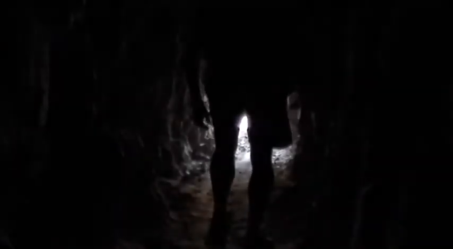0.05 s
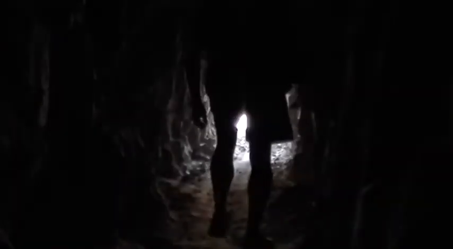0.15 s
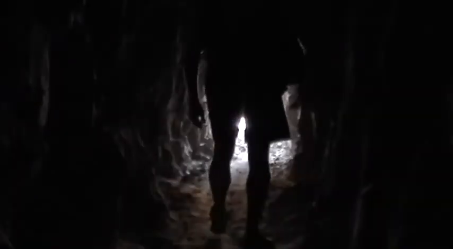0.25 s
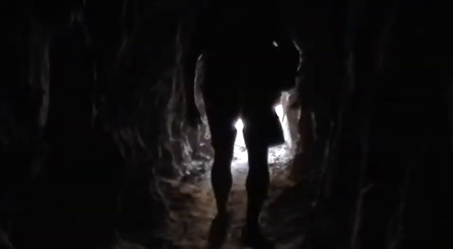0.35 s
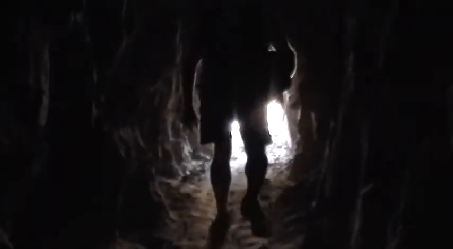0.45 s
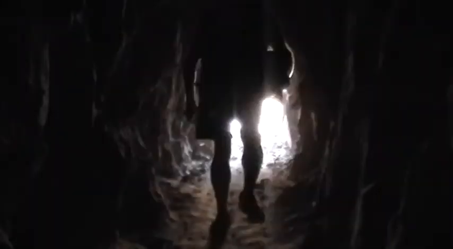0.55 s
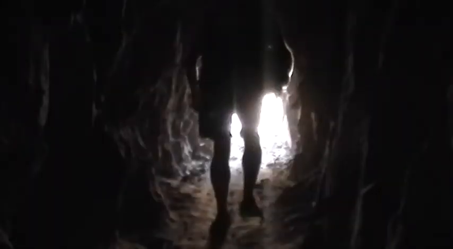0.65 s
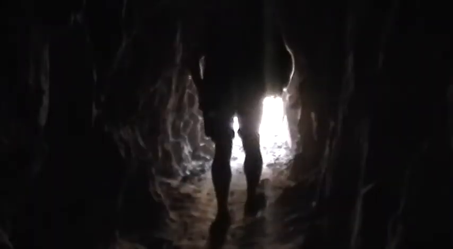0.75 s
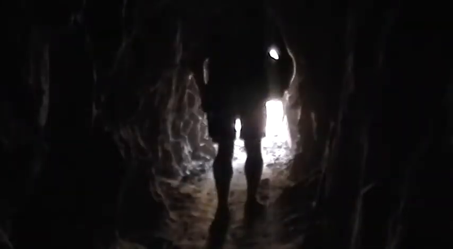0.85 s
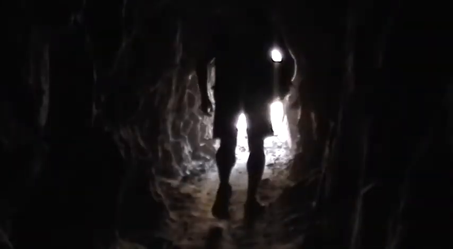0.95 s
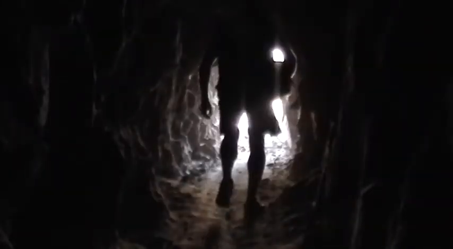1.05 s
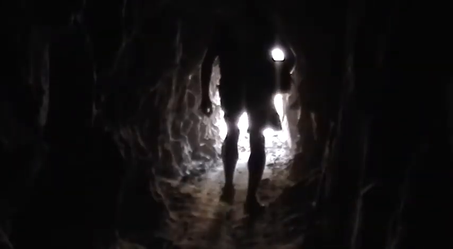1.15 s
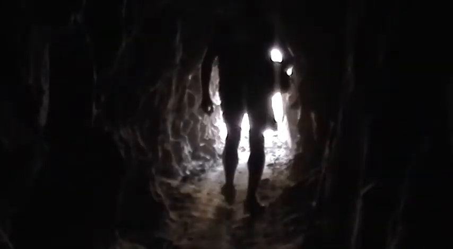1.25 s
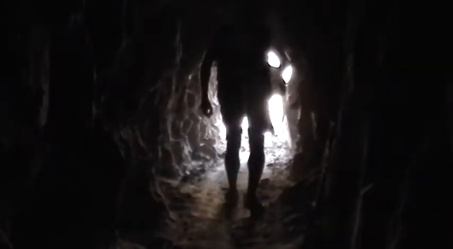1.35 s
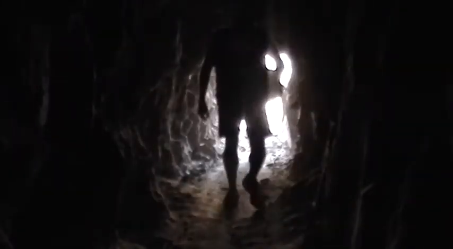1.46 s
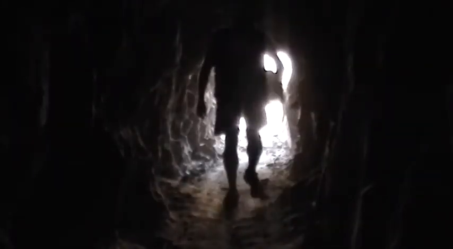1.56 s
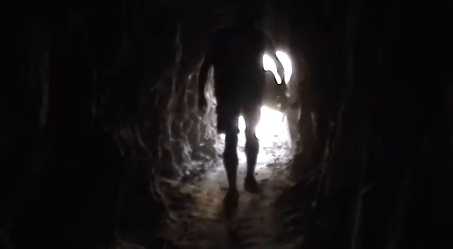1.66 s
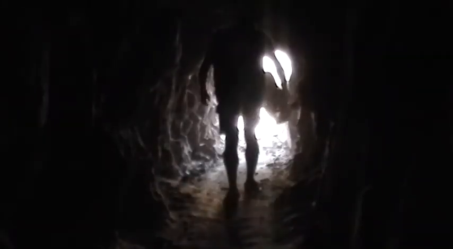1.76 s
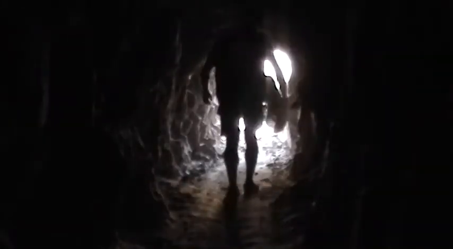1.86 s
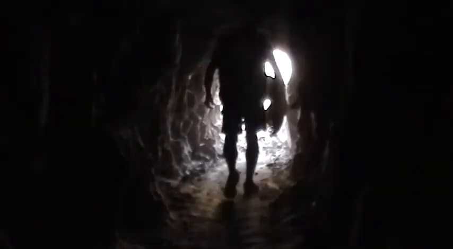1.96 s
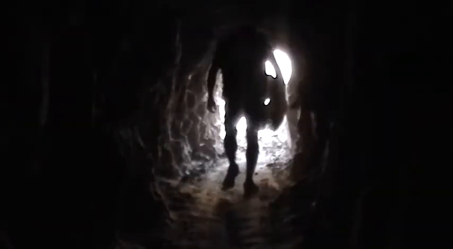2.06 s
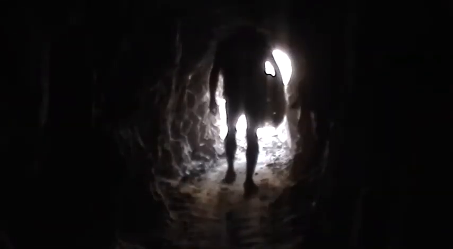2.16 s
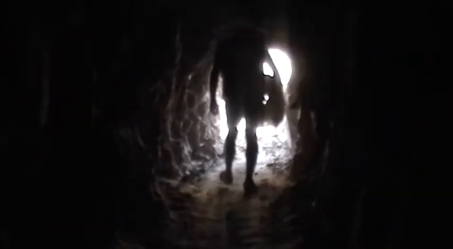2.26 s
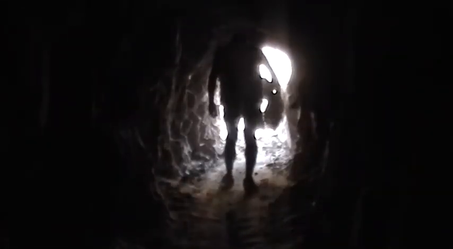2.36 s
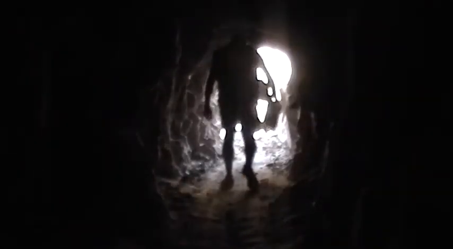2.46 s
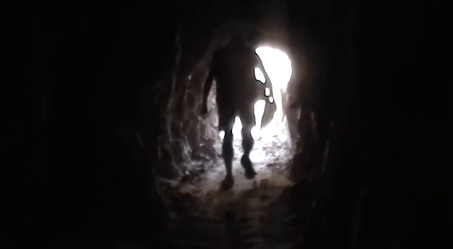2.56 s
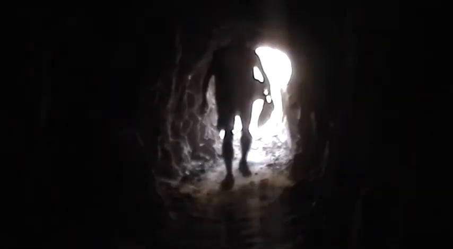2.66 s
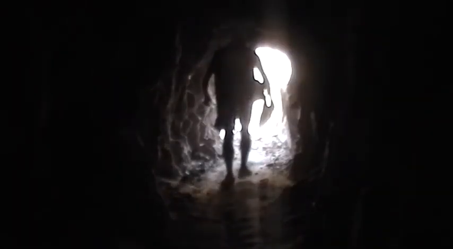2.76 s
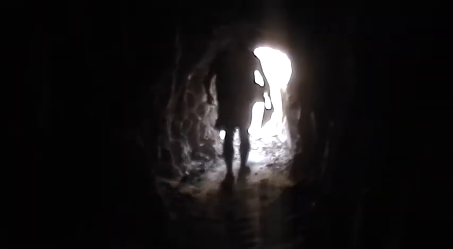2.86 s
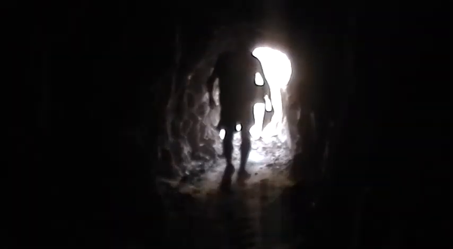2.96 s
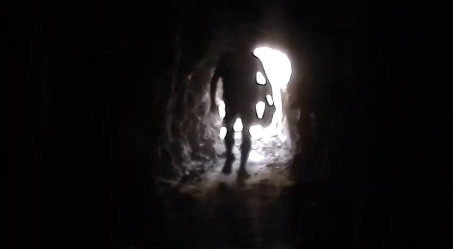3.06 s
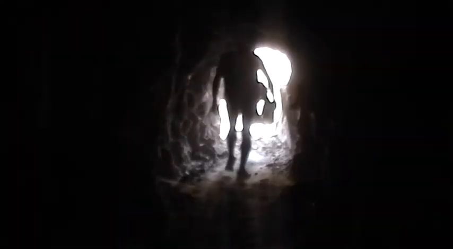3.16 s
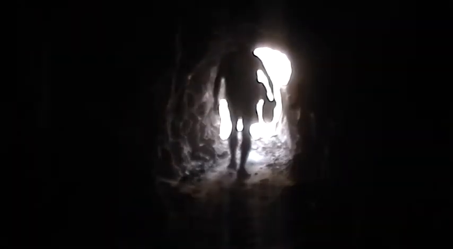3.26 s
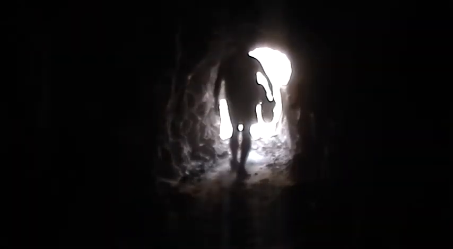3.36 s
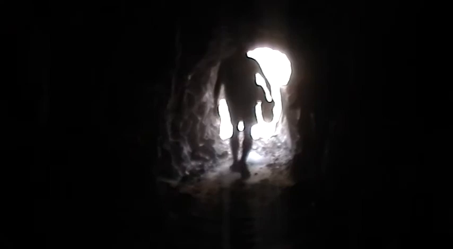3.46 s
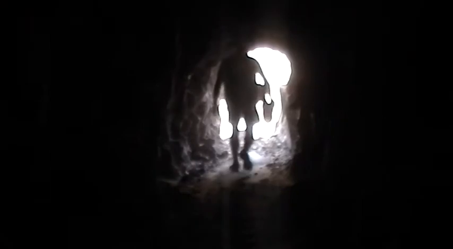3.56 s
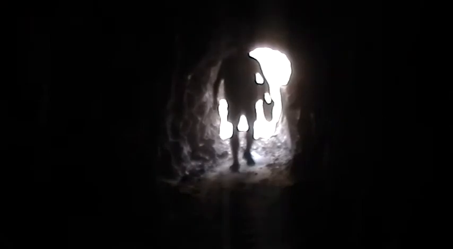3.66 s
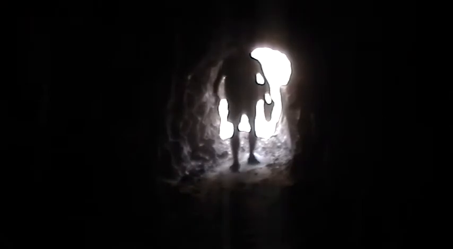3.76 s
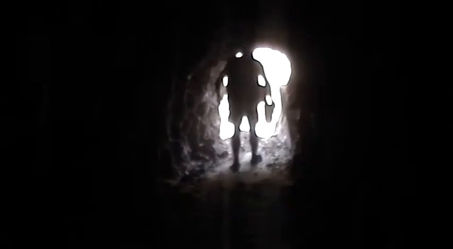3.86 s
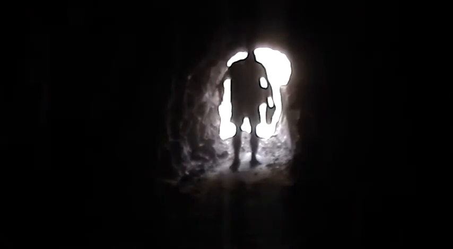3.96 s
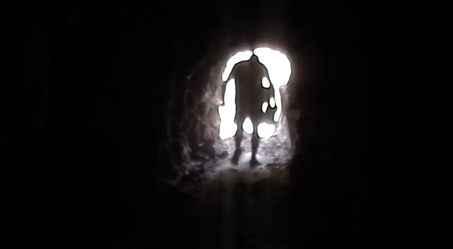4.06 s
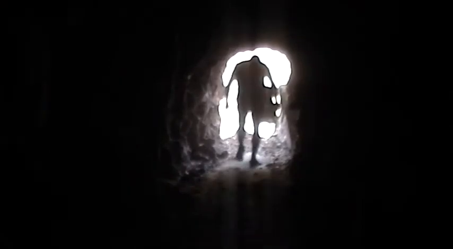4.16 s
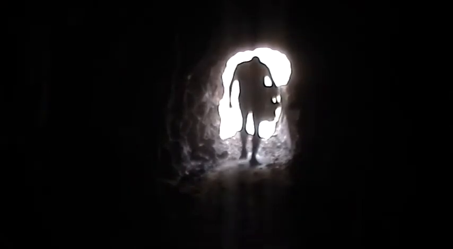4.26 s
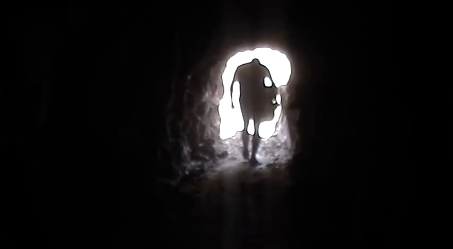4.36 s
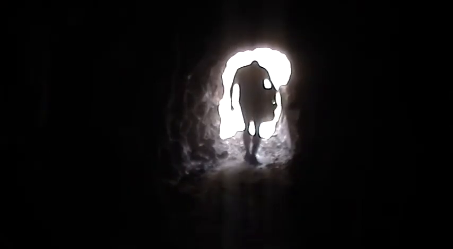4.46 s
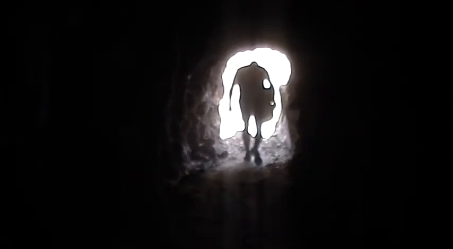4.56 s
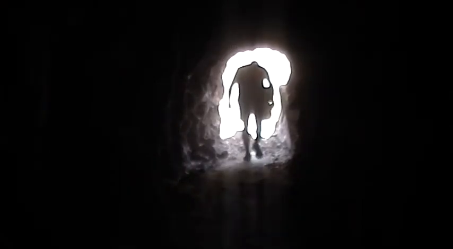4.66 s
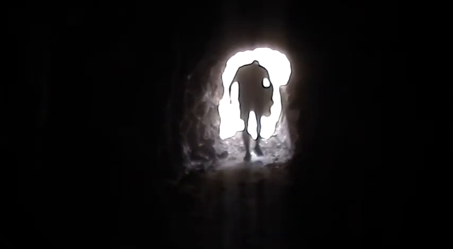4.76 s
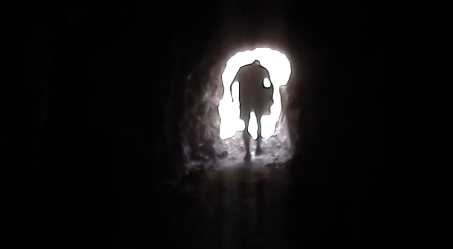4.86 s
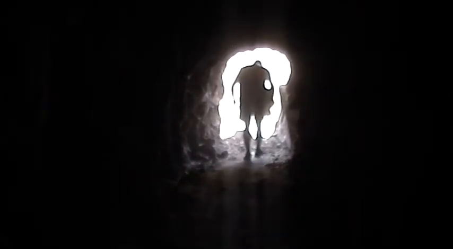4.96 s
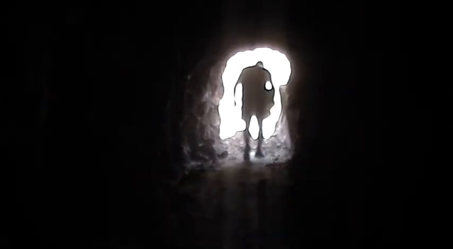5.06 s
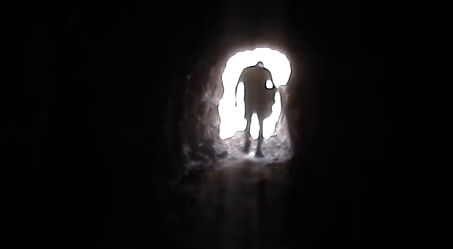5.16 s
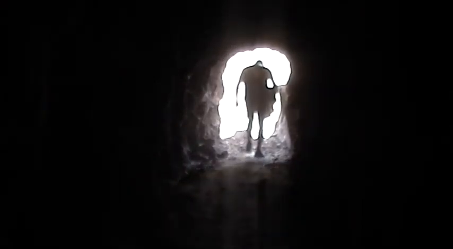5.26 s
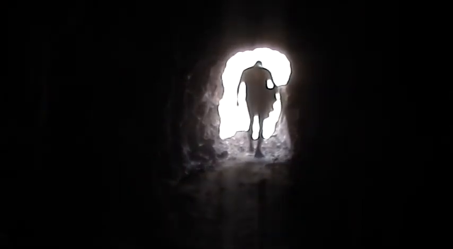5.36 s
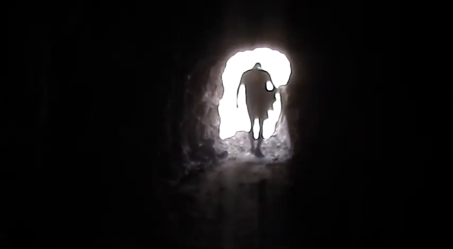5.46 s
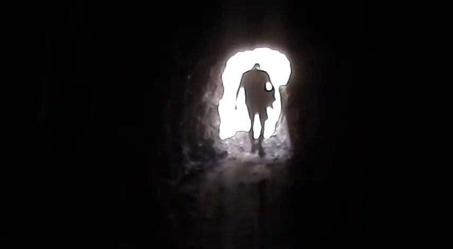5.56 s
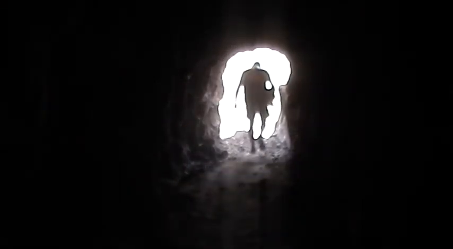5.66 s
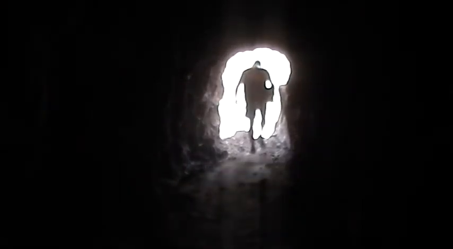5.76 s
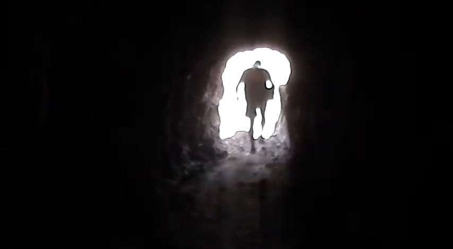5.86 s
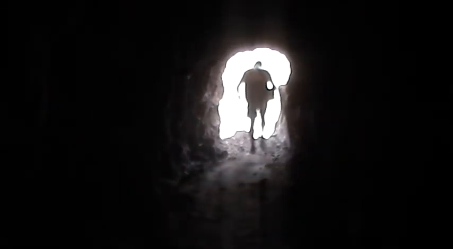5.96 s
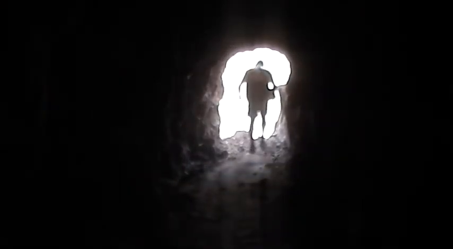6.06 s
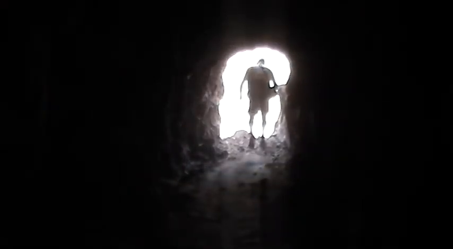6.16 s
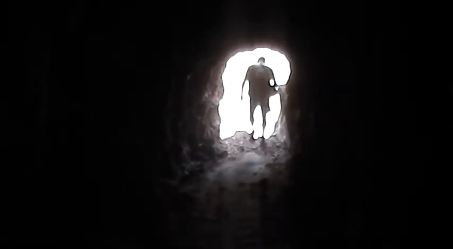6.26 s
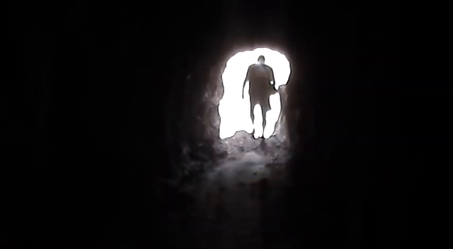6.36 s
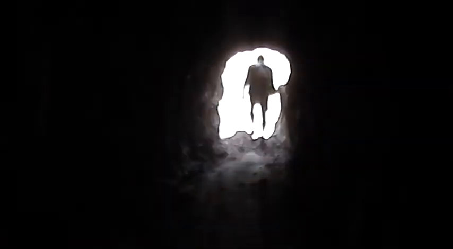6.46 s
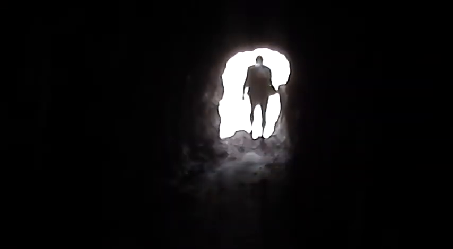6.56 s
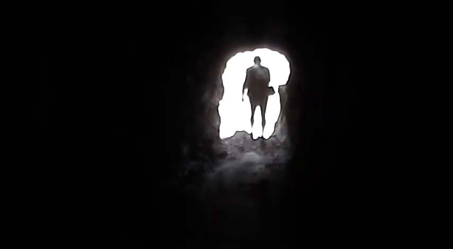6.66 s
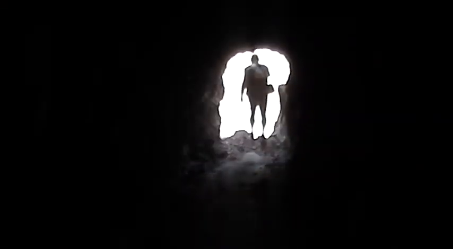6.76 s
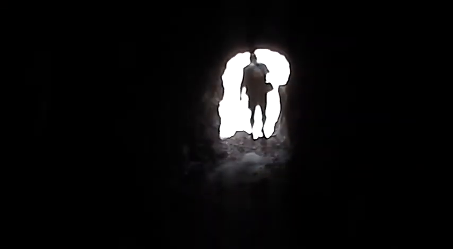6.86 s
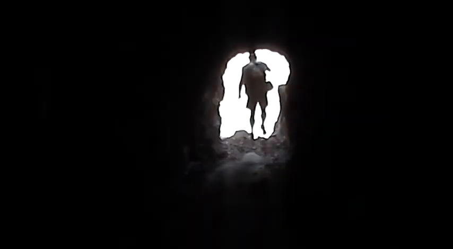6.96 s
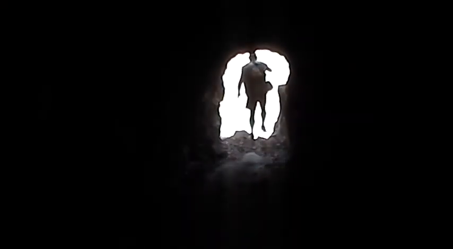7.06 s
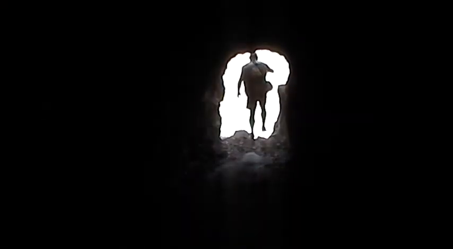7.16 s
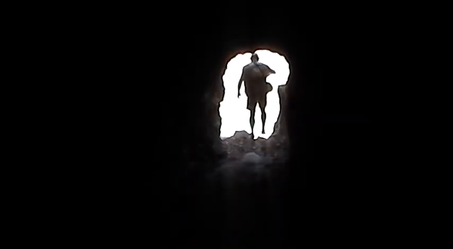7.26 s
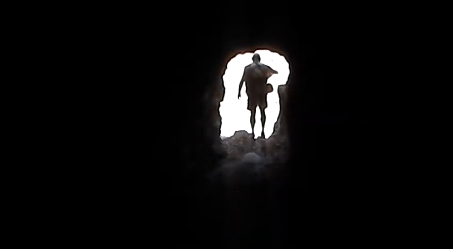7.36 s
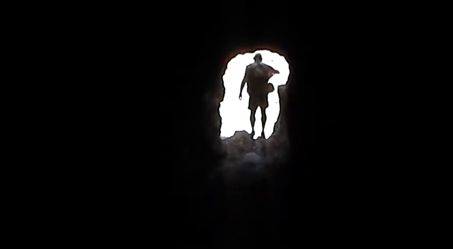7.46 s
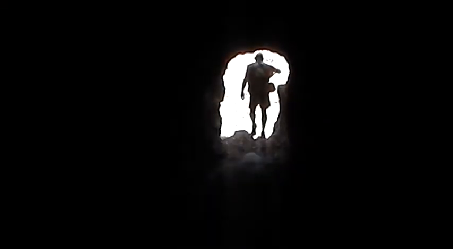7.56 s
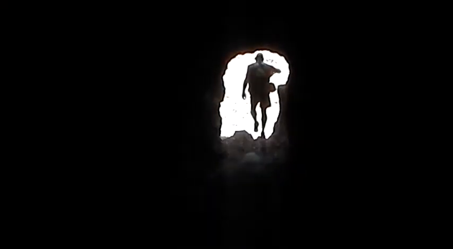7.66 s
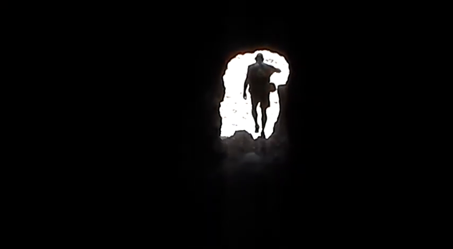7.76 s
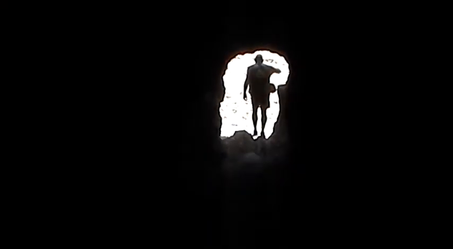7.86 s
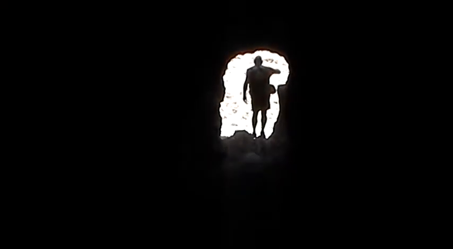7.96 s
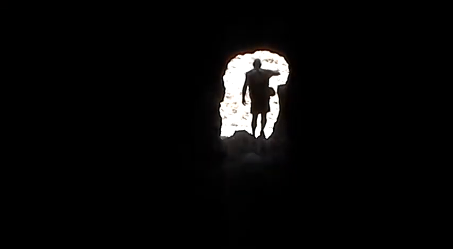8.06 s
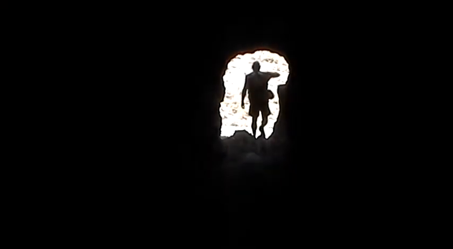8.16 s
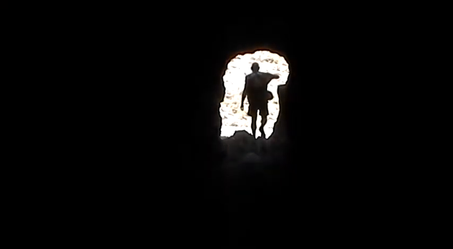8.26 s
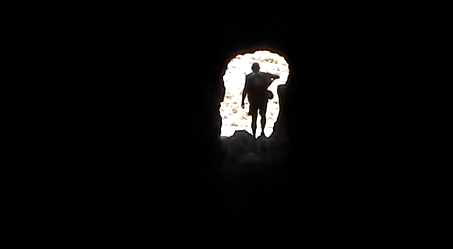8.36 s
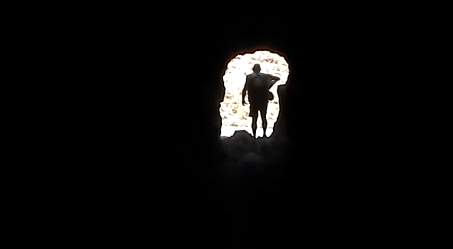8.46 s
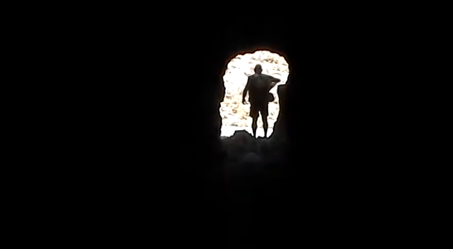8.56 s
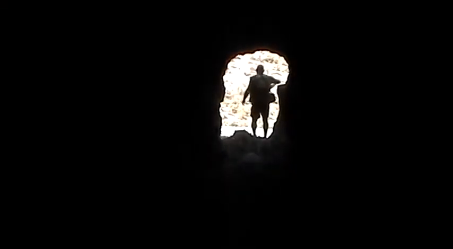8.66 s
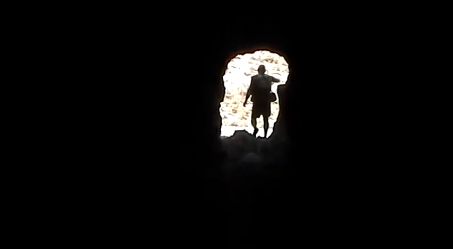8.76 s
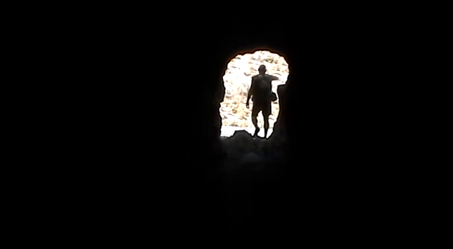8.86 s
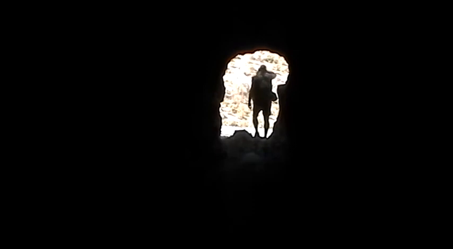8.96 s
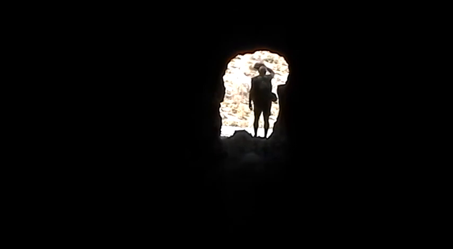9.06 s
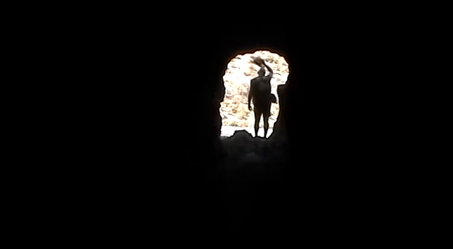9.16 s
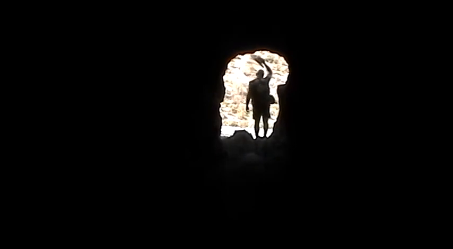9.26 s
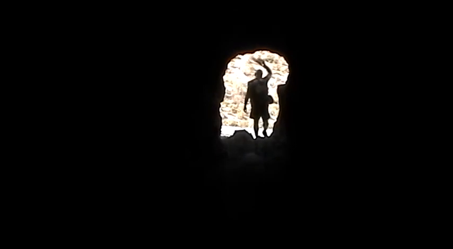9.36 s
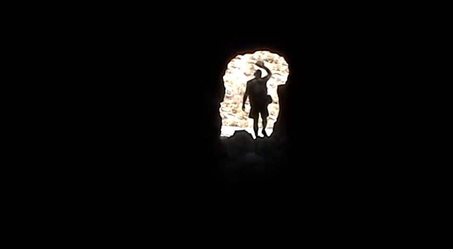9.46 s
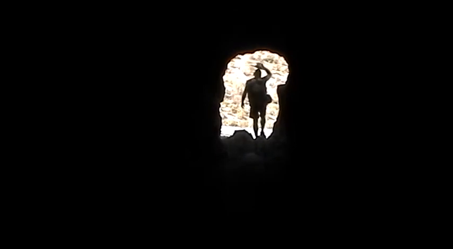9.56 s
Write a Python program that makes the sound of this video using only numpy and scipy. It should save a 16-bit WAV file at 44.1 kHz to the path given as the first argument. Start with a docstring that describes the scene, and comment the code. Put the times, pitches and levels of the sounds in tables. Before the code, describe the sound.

Footsteps crunch over stones and sand in an echoing mine tunnel, fading as the walker moves away, over faint rumble and hiss.

```python
"""Footsteps in a narrow mine tunnel, going away from the microphone towards the exit, some ten metres on.
Heel and sole land apart on rock strewn with stones and sand: the ground thuds, slabs knock, stones
crunch, sand crackles. Soles scrape, pebbles tick and something small of metal clinks.
The rock walls ring on after every step, over a faint low rumble and steady hiss."""
import sys
import numpy as np
from scipy import signal
from scipy.fft import rfft, irfft, next_fast_len
from scipy.io import wavfile

SR = 44100
rng = np.random.default_rng(int(sys.argv[2]) if len(sys.argv) > 2 else 0)


def digitize_waveform(pressure):
    """Quantize a signal to 16-bit integers and store it at the path in sys.argv[1].

    Rows of a 2-D input are taken as channels; values are limited to [-1, 1].
    """
    field = np.atleast_2d(pressure).T
    bounded = np.clip(field, -1, 1)
    quanta = np.round(bounded * 32767).astype(np.int16)
    wavfile.write(sys.argv[1], SR, quanta)


N = 423889
WALK_M_S, GRIT_LOSS_DB_PER_M = 1.02, 2.14


def undb(db):
    """Decibels to gain."""
    return 10 ** (np.asarray(db) / 20)


def unit(x):
    """Scale to rms 1."""
    return x / np.sqrt(np.mean(x ** 2) + 1e-30)


def add(track, s, x):
    """Mix x into the track from time s."""
    i = max(int(s * SR), 0)
    track[i:i + len(x)] += x[:max(N - i, 0)]


def at_hz(hz, table, column=1):
    """Read one column of a table on a log-frequency axis."""
    rows = np.array(table)
    return np.interp(np.log(hz + 1), np.log(rows[:, 0]), rows[:, column])


def resonate(x, hz, q):
    """Pass x twice through a resonance; gain 1 at the centre."""
    size = next_fast_len(len(x) + 4096)
    ratio = (np.arange(size // 2 + 1) + 1e-6) * SR / size / hz
    return irfft(rfft(x, size) / (1 + 1j * q * (ratio - 1 / ratio)) ** 2, size)[:len(x)]


def grains(size, rate, spread_db):
    """Random grain contacts, rate a second: many small, a few large."""
    touches = rng.random(size) < rate / SR
    strength = undb(spread_db * np.minimum(rng.exponential(size=size), 4))
    return touches * strength * np.sign(rng.standard_normal(size))


def near_walls(x, fade_s=0.00714, direct=0.498):
    """Direct sound and a cluster of reflections off rough rock, which smear a click but hardly colour it."""
    t = np.arange(2048) / SR
    cluster = unit(rng.standard_normal(len(t)) * np.exp(-t / fade_s)) / np.sqrt(len(t))
    cluster[0] += direct
    for _ in range(3):  # flatten the spectrum
        spectrum = rfft(cluster, 2 * len(t))
        cluster = irfft(spectrum / np.abs(spectrum))[:len(t)]
    return signal.fftconvolve(x, cluster / np.linalg.norm(cluster))[:len(x)]


def contacts(base_knock_db=-36.5, base_thud_db=-55, loss_db_per_m=2.0, smear_per_m=0.043):
    """Heels and soles: with distance they draw out and knock and crunch weaken; the thud carries."""
    # heels coming down: start_s, force_db, thud_offset_db, crunch_over_knock_db, rise_s
    heels = [(0, 0.5, -5, -3, 0.00033), (.404, -1.5, 4.5, -2.5, 0.041), (.889, -4.5, -3, 2.5, 0.0071),
             (1.442, 3, 0.5, -1.5, 0.0057), (1.86, 2, -10, -13.5, 0.00072), (2.458, 0, 8, 0, .001),
             (2.978, 6, 1, -2, 0.0014), (3.443, 5, 5.5, -4, 0.0012), (4.004, -8.5, -4, 2, 0.013),
             (4.535, -5.5, -2, -7.5, .002), (5.076, -7, 0.5, -2, 0.0039), (5.558, 1.5, 5, 2, 0.00073),
             (6.128, 6, 4, -11, 0.007), (6.754, 2.5, -2, -8, 0.0061), (7.305, -10, -1, -22, 0.0032),
             (7.37, -5.5, -1, -11, 0.061), (8.207, -6, -1, 2.5, 0.0054), (8.69, 2.5, -1.5, -8, 0.012),
             (9.335, -4.5, -4.5, -5, 0.02)]
    # soles slapping down or rolling off, and at 0.331 s a stone knocked, which lands the same short way:
    # start_s, force_db, thud_offset_db, crunch_over_knock_db, rise_s
    soles = [(.068, -11.5, 18.5, -5, 0.0015), (.331, -5.5, -12, -15, .001), (.435, -13.5, -8, 13.5, 0.021),
             (.549, -10.5, -8, 4, 0.0044), (.975, -3.5, 0, 0, .012), (1.085, -11.5, -8, 2.5, 0.015),
             (1.88, 11.5, 7, 1.5, 0.018), (2.021, 6.5, 7, -6, 0.00085), (2.515, 0.5, 0, -2, 0.0048),
             (2.623, 2.5, 10.5, -14, 0.0022), (3.066, 8, -5, -3, 0.00057), (3.55, 0, -19, 4.5, 0.00114),
             (4.055, -4, -12, 2.5, 0.021), (4.571, -9, -11, 1, 0.072), (5.144, -6.5, -12, 11, 0.012),
             (5.622, -12, -10, 10.5, 0.014), (6.106, -23, 0, -3, .001), (6.19, -7, -10, 4.5, 0.004),
             (6.785, 1.5, -19, -5, .006), (7.448, -0.5, 1, -1.5, 0.025), (8.235, 2.5, 8, 1, 0.022),
             (8.81, -9.5, -8, 8, .001), (9.39, -1.5, -20, -5, .001)]
    # the floor, hollow or firm, coarse or fine, bare or sandy: time_s, knock_hz, crunch_hz, sand_db
    floor = [(0, 530, 1650, -58), (.89, 627, 3440, -64), (1.44, 420, 1940, -59), (2, 560, 2080, -54),
             (3, 556, 2150, -66), (3.5, 540, 2140, -49), (4.2, 560, 2300, -69.5), (5.56, 600, 2750, -58),
             (6.13, 417, 2900, -54), (6.8, 487, 2100, -78), (7.3, 403, 1500, -87), (8.25, 306, 1470, -64),
             (9.4, 400, 1430, -74)]
    floor_s, *floor_columns = np.transpose(floor)
    # under a heel the ground settles more slowly and more sand is dug up
    for rows, fade_s, dig_db in ((heels, 0.057, -0.5), (soles, 0.03, -1.5)):
        for s, force_db, thud_offset_db, crunch_over_knock_db, rise_s in rows:
            metres = WALK_M_S * s
            knock_db = base_knock_db + force_db - loss_db_per_m * metres
            knock_hz, crunch_hz, sand_db = (np.interp(s, floor_s, column) for column in floor_columns)
            yield (s, base_thud_db + thud_offset_db, knock_db, knock_hz, knock_db + crunch_over_knock_db,
                   crunch_hz, sand_db + dig_db, rise_s, fade_s * (1 + smear_per_m * metres))


def footfall(thud_db, knock_db, knock_hz, crunch_db, crunch_hz, sand_db, rise_s, fade_s):
    """The load on the ground rises and dies away, setting off grains from slabs down to sand."""
    t = np.arange(16384) / SR
    load = np.minimum(t / rise_s, 1) * np.exp(-np.maximum(t - rise_s, 0) / fade_s)

    def layer(hz, q, rate, spread_db):
        """Grains of one size, ringing briefly, as strong as the load."""
        ring = resonate(load * grains(len(t), rate, spread_db), hz, q)
        return unit(ring) * np.sqrt(np.mean(load ** 2))

    thud = undb(thud_db) * layer(hz=173, q=0.52, rate=4100, spread_db=1.0)
    knock = undb(knock_db - 0.2) * layer(knock_hz, q=0.53, rate=2000, spread_db=1.5)
    slab_hz = rng.uniform(620, 1323, size=2)  # two loose slabs clack underfoot
    slabs = undb(knock_db - 10.5) * sum(layer(hz, q=4.8, rate=900, spread_db=6.0) for hz in slab_hz)
    crunch = undb(crunch_db) * layer(crunch_hz, q=0.67, rate=1800, spread_db=0.5)
    sand = undb(sand_db + 2.5) * layer(hz=8300, q=1.0, rate=1400, spread_db=7.0)
    # the sand reaches the microphone mostly straight from the shoe
    return near_walls(thud + knock + slabs + crunch) + near_walls(sand, fade_s=0.0064, direct=0.78)


def footsteps(lead_s=0.035, lead_db=-14, brush_limit_db=-54):
    """The shoe brushes the ground softly just before each footfall."""
    track = np.zeros(N)
    swell = np.linspace(0, 1, int(lead_s * SR))
    for s, thud_db, knock_db, knock_hz, *rest in contacts():
        brush = swell * unit(resonate(rng.standard_normal(len(swell)), 2 * knock_hz, q=0.52))
        add(track, s - lead_s, undb(min(knock_db + lead_db, brush_limit_db)) * brush)
        add(track, s, footfall(thud_db, knock_db, knock_hz, *rest))
    return track


def grit(start_db=-58):
    """Grit shifts under the standing foot, fainter with every metre from the microphone."""
    shifting = resonate(grains(N, rate=500, spread_db=0.0), hz=1340, q=0.28)
    metres = WALK_M_S * np.arange(N) / SR
    return unit(near_walls(shifting)) * undb(start_db - GRIT_LOSS_DB_PER_M * metres)


def scrapes():
    """A dragging sole sticks and slips; its rasp crossfades from one pitch to another."""
    # drags over the rock: start_s, length_s, level_db, start_hz, end_hz
    drags = [(0, 0.036, -34, 1910, 1680), (1.379, 0.14, -53.5, 2580, 2500),
             (2.744, 0.099, -43.5, 3320, 1740), (4.37, 0.17, -58.5, 980, 1750),
             (6.531, 0.26, -57.5, 2050, 915), (7.364, .13, -61, 980, 1400), (8.088, 0.058, -60, 3000, 1600)]
    track = np.zeros(N)
    for s, length_s, db, start_hz, end_hz in drags:
        progress = np.linspace(0, 1, int(length_s * SR))
        early, late = (unit(resonate(grains(len(progress), rate=2200, spread_db=7), hz, q=1.53))
                       for hz in (start_hz, end_hz))
        pressure = np.minimum(progress * 5, 1) * np.sqrt(1 - progress)
        rasp = pressure * (np.sqrt(1 - progress) * early + np.sqrt(progress) * late)
        add(track, s, undb(db) * rasp)
    return near_walls(track)


def tunnel(x, wet_db=-4.5, build_s=0.0018):
    """Sound runs up and down the tunnel: the bass stays longest and comes from all sides."""
    # the tunnel's reverberation: band_hz, t60_s, side_weight_db
    reverberation = [(60, 0.92, -7), (129, 0.87, 2), (277, 1.12, -9.5), (710, 0.81, -4.5), (1940, 0.5, -3),
                     (4900, 0.32, -12.5), (7960, 0.22, -66), (13000, 0.058, 9)]
    size, hop = 49152, SR // 4
    t, hz = np.arange(size) / SR, np.fft.rfftfreq(size, 1 / SR)
    noise = rfft(rng.standard_normal(size))
    edges = np.geomspace(30, 18000, 15)
    centres = np.sqrt(edges[1:] * edges[:-1])
    bands = np.array([irfft(noise * (hz >= lo) * (hz < hi)) for lo, hi in zip(edges, edges[1:])])
    # the tail builds up as the reflections multiply, then each band dies at its own rate
    build = 1 - np.exp(-t / build_s)
    envelope = build * np.exp(-np.log(1000) * t / at_hz(centres, reverberation)[:, None])
    side_weight = undb(at_hz(centres, reverberation, column=2) - 2.0)
    wet = np.zeros((2, N))
    # the pattern of echoes changes as the walker moves on
    for i in range(0, N, hop):
        for track, weight in zip(wet, (np.ones(len(centres)), side_weight)):
            tail = weight @ (np.roll(bands, rng.integers(size), axis=1) * envelope)
            add(track, i / SR, signal.fftconvolve(x[i:i + hop], tail))
    mid, side = (undb(wet_db) * np.sqrt(30 / SR) * cross_modes(track) for track in wet)
    return np.array([x + mid + side, x + mid - side])


def cross_modes(x):
    """Standing waves between the walls colour a few pitches."""
    # resonances across the tunnel: pitch_hz, width_hz, gain_db
    standing_waves = [(115.5, 18, 5.5), (234, 15, 2.5), (317, 45, 4.5), (377, 18, 6.5), (622, 17, 1.5),
                      (822, 25, -1.5), (888, 16, 2), (1506, 26, 1), (1950, 22, 7)]
    return x + sum((undb(db) - 1) * signal.lfilter(*signal.iirpeak(hz, hz / width, fs=SR), x)
                   for hz, width, db in standing_waves)


def rumble_and_hiss(mid_db=-63.5):
    """A faint low rumble under steady hiss."""
    # spectrum of the background noise: frequency_hz, relative_db
    noise_spectrum = [(15, -43), (25, -14.5), (113, 3), (378, -1.5), (552, -6.5), (1530, -12),
                      (2010, -10.5), (2490, -18), (3720, -12), (4260, -14.5), (6210, -21), (7300, -19.5),
                      (8580, -19), (11800, -19), (15500, -23)]
    # side level of the background noise by frequency: frequency_hz, side_over_mid_db
    side_levels = [(60, 5), (200, 11.5), (700, 8.5), (1290, 0.5), (2380, -5.5), (4400, -15.5), (8120, -27),
                   (12500, -11.5), (15500, -18)]
    # faint whines in the hiss: pitch_hz, width_hz, level_db
    whine_bands = [(3730, 57, -83), (7317, 850, -76), (7200, 91, -79.5), (11400, 330, -85.5)]
    size = 2 ** 19
    hz = np.fft.rfftfreq(size, 1 / SR)
    mid, side = rfft(rng.standard_normal((2, size))) * undb(at_hz(hz, noise_spectrum))
    mid, side = irfft(mid)[:N], irfft(side * undb(at_hz(hz, side_levels)))[:N]
    noise = np.array([mid + side, mid - side]) * undb(mid_db) / np.std(mid)
    whines = sum(undb(db) * unit(resonate(rng.standard_normal(N), pitch, q=pitch / width))
                 for pitch, width, db in whine_bands)
    return noise + whines


def pebbles(fade_s=0.0036, blow=4):
    """A stone or crumb hits the rock once, then chatters and rings for a few milliseconds."""
    # stones kicked or knocked together: start_s, level_db, pitch_hz
    stones = [(.071, -39.5, 4200), (0.331, -41, 1178), (.458, -27.5, 1740), (.557, -37.5, 3860),
              (0.678, -38.5, 3050), (.735, -50, 3600), (.837, -46.5, 1030), (.908, -33, 4900),
              (.979, -50, 3470), (1.133, -48.5, 8500), (1.443, -38, 2730), (1.862, -33.5, 1790),
              (2.024, -20.5, 780), (2.024, -32, 3980), (2.46, -38, 3220), (2.624, -31.5, 760),
              (3.067, -32, 3140), (3.388, -49.5, 1780), (4.467, -54, 9500), (4.536, -48.5, 1090),
              (4.642, -43.5, 3260), (5.165, -36, 4900), (5.323, -54, 4490), (5.87, -55, 3830),
              (6.977, -52.5, 1620), (7.489, -43, 1780), (7.927, -57, 1940), (8.174, -53.5, 2850),
              (8.931, -59.5, 3300), (9.177, -58, 3560)]
    track, t = np.zeros(N), np.arange(4096) / SR
    dying = np.exp(-t / fade_s)
    for s, db, hz in stones + crumbs():
        push = dying * grains(len(t), rate=1900, spread_db=8.0)
        push[0] += blow
        tick = unit(near_walls(resonate(push, hz, q=1.39), direct=0.62))
        add(track, s, undb(db) * tick * np.sqrt(2 * np.mean(dying ** 2)))
    return track


def crumbs(count=26, start_db=-57, spread_db=10, centre_hz=8000, spread_octaves=0.63):
    """Crumbs of rock tick along the way, fainter with distance: start_s, level_db, pitch_hz."""
    when, size, pitch = rng.random((count, 3)).T
    s = (np.arange(count) + when) / count * N / SR
    db = start_db + spread_db * (2 * size - 1) - GRIT_LOSS_DB_PER_M * WALK_M_S * s
    hz = centre_hz * 2 ** (spread_octaves * (2 * pitch - 1))
    return list(zip(s, db, hz))


def metal_clinks(spread_db=3.4):
    """Each clink rings the same modes with new weights; a held piece rings shorter."""
    # knocks on the metal: start_s, level_db, share_of_t60
    knocks = [(3.463, -39, 0.15), (3.536, -40.5, 0.56), (3.546, -51, .45), (3.562, -50, .4),
              (6.757, -40.5, 0.12)]
    # modes of the small piece: pitch_hz, relative_db, t60_s
    metal_modes = [(5640, -22, 0.186), (7600, -13.5, .2), (7461, -7, 0.32), (8130, 8.5, 0.2),
                   (9340, 9, 0.2), (9960, 0, 0.49), (10450, -9, .25), (10840, 6, 0.26), (12280, -11, .3),
                   (13560, -8, .13), (13400, -5, 0.138), (14400, -7, .18), (15130, -12, .13)]
    track, t = np.zeros(N), np.arange(16384) / SR
    hz, mode_db, t60 = np.transpose(metal_modes)[:, :, None]
    for s, db, share in knocks:
        weight = undb(mode_db + spread_db * rng.standard_normal(hz.shape))
        modes = weight * np.sin(2 * np.pi * hz * t) * np.exp(-np.log(1000) * t / (t60 * share))
        add(track, s, undb(db) * near_walls(modes.sum(0) / np.linalg.norm(weight)))
    return track


def scene():
    """The walker's sounds reach the microphone through the tunnel, over rumble and hiss."""
    walker = footsteps() + grit() + scrapes() + pebbles() + metal_clinks()
    return tunnel(walker) + rumble_and_hiss()


def record(dry, top_hz=15750):
    """The recorder cuts the top treble steeply."""
    return signal.sosfilt(signal.ellip(10, .2, 70, top_hz, fs=SR, output="sos"), dry)


dry = scene()
out = record(dry)
digitize_waveform(out)
```